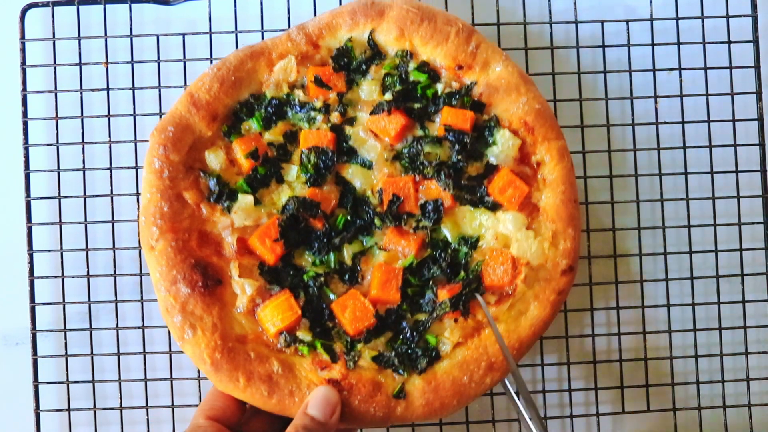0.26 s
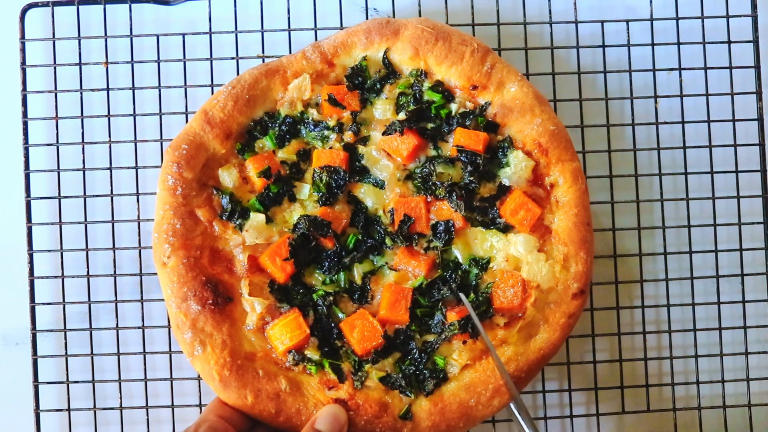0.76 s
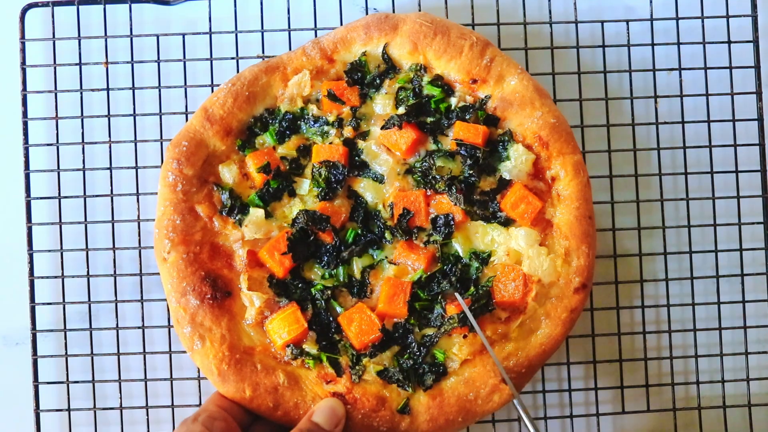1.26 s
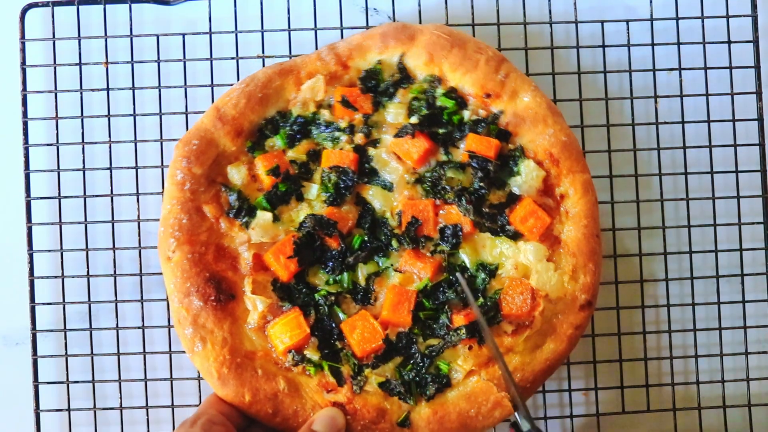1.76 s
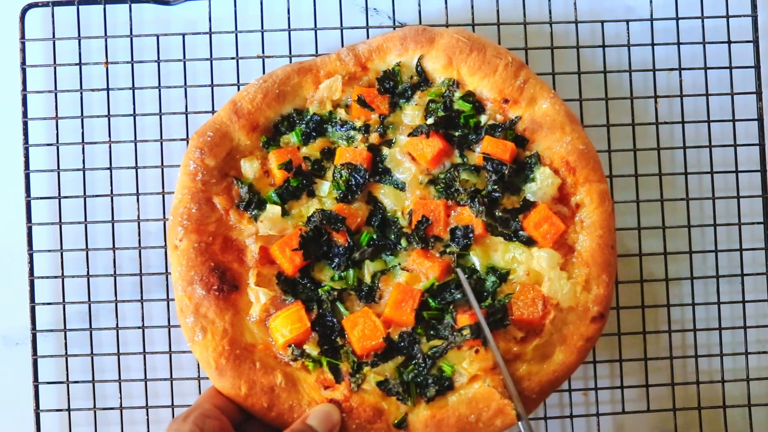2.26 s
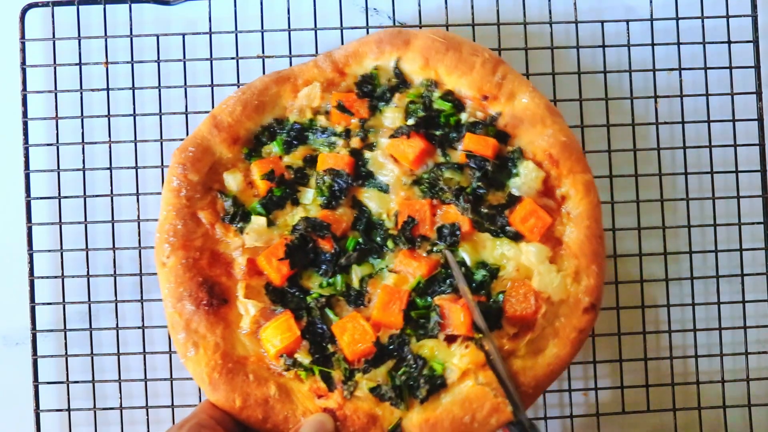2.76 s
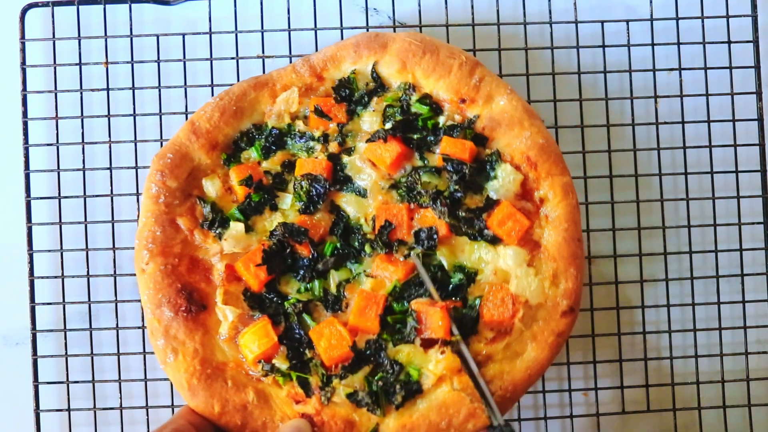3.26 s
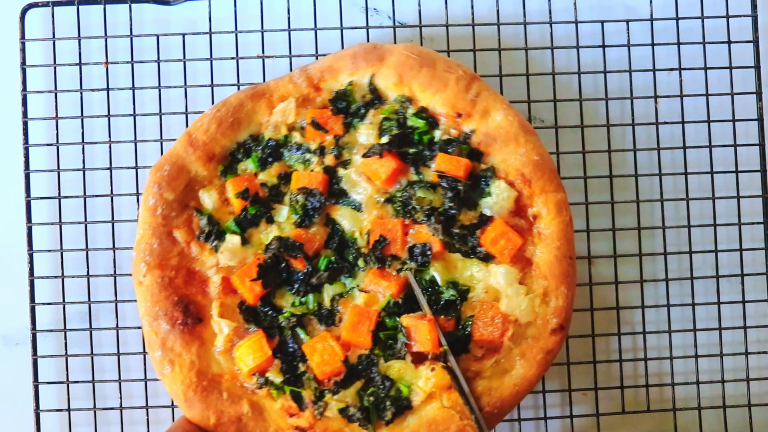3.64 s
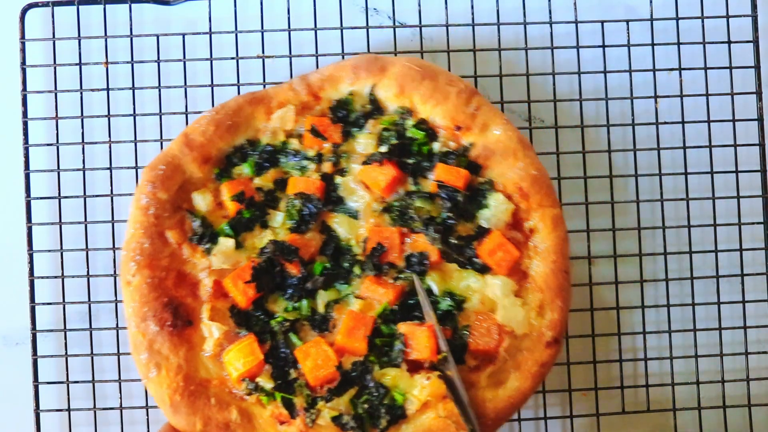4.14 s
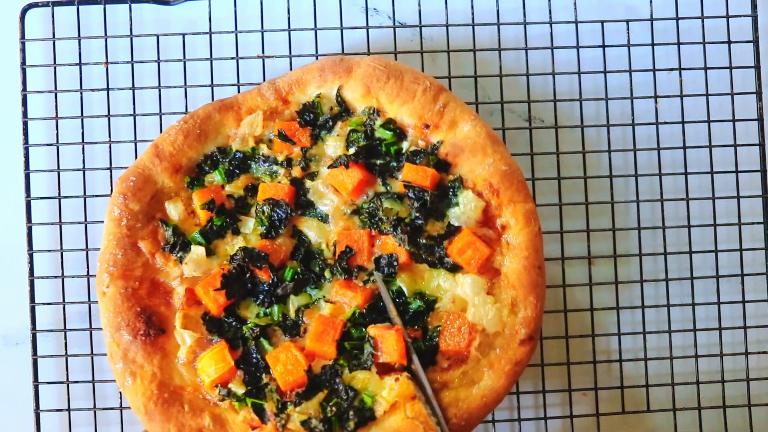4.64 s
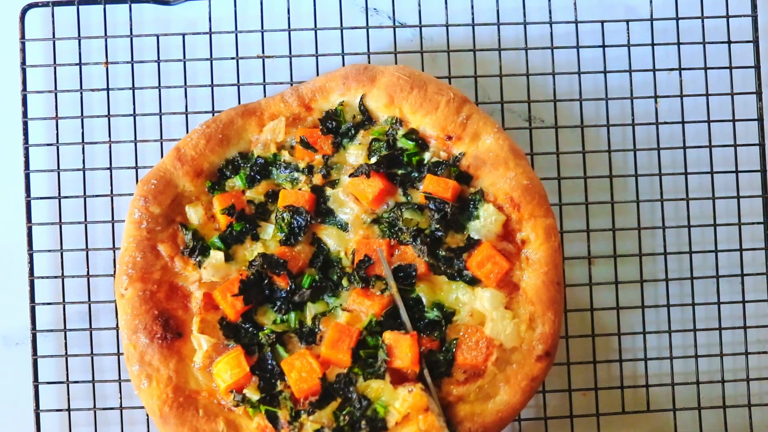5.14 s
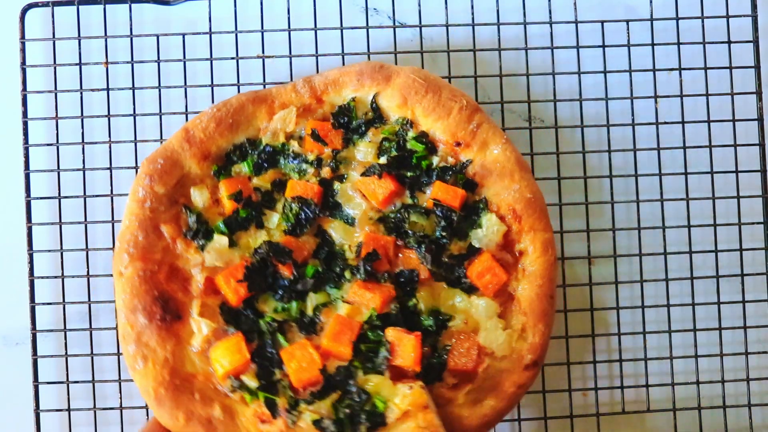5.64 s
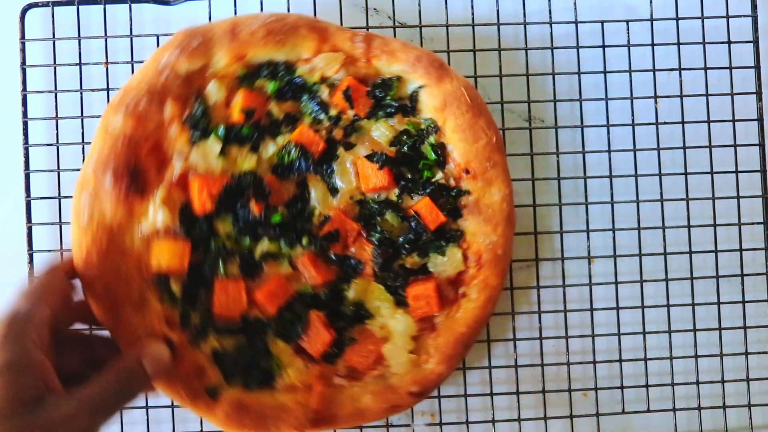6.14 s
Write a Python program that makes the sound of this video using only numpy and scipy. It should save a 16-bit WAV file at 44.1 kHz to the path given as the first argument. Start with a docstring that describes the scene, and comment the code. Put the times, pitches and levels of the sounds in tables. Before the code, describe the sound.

Scissors snip through a crisp pizza crust on a wire rack, with dry snaps, fine crackle, rubbing and dull knocks, close up.

```python
"""In a quiet room, kitchen scissors cut a crisp pizza on a wire cooling rack, heard from close by.
The base drags and knocks on the wires as noise grains and damped tones, and sets the rack ringing.
The crust snaps in noise bursts of a few ms over fine crackle; the table booms through low resonances.
The pivot squeaks twice in gliding tones, the bare blades ring late on, and shaped noise hisses below."""
import sys
import numpy as np
from scipy import signal
from scipy.fft import rfft, irfft, next_fast_len
from scipy.io import wavfile
from scipy.ndimage import uniform_filter1d, map_coordinates

SR = 44100
rng = np.random.default_rng(int(sys.argv[2]) if len(sys.argv) > 2 else 0)


def dump(signal):
    """Clip the signal to [-1, 1] and save it as 16-bit WAV at the path in sys.argv[1]."""
    limited = np.clip(np.atleast_2d(signal).T, -1, 1)
    pcm = np.round(limited * 32767).astype(np.int16)
    wavfile.write(sys.argv[1], SR, pcm)


N = 281799


def amp(db):
    """Logarithmic level: decibels become a gain."""
    return 10 ** (np.asarray(db) / 20)


def unit(x):
    """Normalisation: the signal is scaled to rms 1."""
    return x / np.sqrt(np.mean(x ** 2) + 1e-20)


def along(points, hz):
    """Interpolation of (Hz, value) points on a logarithmic frequency axis."""
    point_hz, value = np.transpose(points)
    return np.interp(np.log(hz + 1), np.log(point_hz + 1), value)


def wobble(rate):
    """Slow random fluctuation: a smooth curve through random knots, rate of them a second."""
    knots = rng.standard_normal(int(N * rate / SR) + 4)
    return map_coordinates(knots, [np.arange(N) * rate / SR])


def filtered(x, response):
    """Linear filtering: the spectrum is multiplied by a complex response of frequency."""
    m = next_fast_len(N + SR // 2)
    return irfft(rfft(x, m) * response(np.fft.rfftfreq(m, 1 / SR)), m)[..., :N]


def coloured(x, spectrum):
    """Spectral shaping: a (Hz, dB) curve weights each frequency."""
    return filtered(x, lambda hz: amp(along(spectrum, hz)))


def resonance(f, centre_hz, width_hz, db):
    """Damped resonator: a causal response that peaks at its centre."""
    damping = 1j * f * width_hz
    return amp(db) * damping / (centre_hz ** 2 - f * f + damping)


def modes(rows):
    """Modal superposition: (Hz, width Hz, dB) resonances are summed with alternating sign."""
    return lambda f: sum((-1) ** k * resonance(f, *row) for k, row in enumerate(rows))


def ringing(rows):
    """Modal superposition in phase: every resonance is in step with the sound that drives it."""
    return lambda f: sum(resonance(f, *row) for row in rows)


def twice(rows):
    """Cascaded resonance: the same response applied twice has steeper skirts."""
    return lambda f: modes(rows)(f) ** 2


def placed(times, rows):
    """Superposition: short sounds, one a row, are added at their times."""
    at = np.round(times * SR).astype(int)[:, None] + np.arange(rows.shape[1])
    return np.bincount(at.ravel(), rows.ravel(), N + rows.shape[1])[:N]


def grains(per_s, spread_db, t60, clump, bed):
    """Friction as shot noise: decaying noise bursts at clumped moments over rubbing, evened slowly."""
    when = rng.random(N) < per_s / SR * np.exp(clump * wobble(40))
    size = when * amp(spread_db * np.minimum(rng.exponential(size=N), 3))
    decay = amp(-60 / (t60 * SR))
    fade = bed + unit(signal.lfilter([1], [1, -decay], size))
    fade /= np.sqrt(np.abs(uniform_filter1d(fade ** 2, size=SR // 12)))
    return unit(fade * rng.standard_normal(N))


def swells(s, swell_s, dying_s, db):
    """Energy summation: overlapping gestures, each rising to a peak and dying, give one level in dB."""
    range_db = 20  # fall from the peak after one swell or dying time
    bend = 1.6  # over 1: rounded at the peak, steeper towards the end
    late = np.arange(0, N + 64, 64) / SR - np.c_[s]
    distance = np.maximum(-late / np.c_[np.abs(swell_s)], late / np.c_[np.abs(dying_s)])
    level_db = np.c_[db] - range_db * distance ** bend
    power = np.sum(amp(level_db) ** 2, axis=0) + amp(-120) ** 2
    total_db = 10 * np.log10(power)
    return np.interp(np.arange(N), 64 * np.arange(len(total_db)), total_db)


# Relative spectrum of the hiss. Each row: frequency in Hz, density in dB.
HISS_SPECTRUM = [(18, -42), (30, -29), (50, -31), (63, 6.5), (107, 3), (146, 4), (171, -4), (306, 0.5),
                 (368, -44), (625, -14), (2470, -4), (16500, -13.5)]


def hiss():
    """Stationary noise: a shaped spectrum at a nearly constant level."""
    level_db = -81.5 + 0.11 * wobble(7.3)
    return amp(level_db) * unit(coloured(rng.standard_normal(N), HISS_SPECTRUM))


# Pushes, squeezes and turns of the pizza. Each row: peak time in seconds, swell in seconds,
# dying in seconds, drag of the base in dB, its bending in dB relative to the drag,
# crackle of the crust in dB, tilt of the crackle to the treble in dB (down for dull, up for bright).
HAND_MOVES = [(.28, 0.029, 0.32, -62, -38, -73.5, -14.5), (.42, 0.13, 0.11, -58.5, -27, -67.5, -11),
              (.52, 0.12, 0.12, -52.5, -15, -62, -12.5), (.65, 0.08, 0.25, -69.5, -31, -71, -7),
              (.76, 0.076, 0.088, -77.5, -35, -69, -12), (.93, 0.13, 0.065, -79.5, -20, -71, -6.5),
              (1.06, 0.12, 0.1, -86.5, -19, -67.5, -4.5), (1.135, 0.023, 0.12, -63, -14, -64.5, -2),
              (1.265, 0.066, 0.4, -58.5, -8.5, -52.5, -4.5), (1.41, 0.058, 0.15, -56, -24, -57, -2),
              (1.702, 0.048, 0.21, -54.5, -16, -54, -10), (1.829, .2, 0.11, -53.5, -14.5, -79, -10),
              (1.56, 0.13, 0.21, -87, -38, -66, -6), (1.972, 0.034, 0.063, -69, -25, -62, -5.5),
              (2.053, 0.085, 0.093, -64.5, -52, -64.5, -8), (2.13, .06, 0.11, -79.5, -33, -70, -6),
              (2.278, 0.015, 0.048, -46.5, -2.5, -60, -7), (2.385, 0.16, 0.092, -61.5, -22, -58.5, -7),
              (2.48, .1, 0.16, -57, -10, -61, 1), (2.59, 0.14, 0.088, -58, -20, -59.5, -7),
              (2.675, .05, .05, -70, -7, -63, -7), (2.703, 0.034, 0.076, -45.5, -3, -60.5, 2),
              (2.76, 0.094, 0.14, -52, -29, -60, -14.5), (2.98, 0.12, .15, -65.5, -39, -69.5, -10.5),
              (3.2, 0.18, 0.36, -78, -52.5, -69.5, -9), (3.318, 0.048, 0.099, -51, -3, -56, -11),
              (3.456, 0.016, 0.028, -58, -10, -50.5, 0), (3.53, 0.45, 0.16, -60, -7, -67.5, -6),
              (3.701, 0.14, 0.11, -56, -16, -58.5, -6.5), (3.85, 0.11, 0.087, -71, -32, -75, -9),
              (3.95, .14, 0.12, -59.5, -24, -71.5, -14), (4.1, 0.12, 0.17, -70.5, -38, -75.5, -14.5),
              (4.19, 0.035, 0.092, -63, -38, -70, -11), (4.24, 0.028, 0.11, -51.5, -21, -67, -13),
              (4.41, 0.18, 0.12, -60.5, -21, -70, -0.5), (4.489, 0.18, 0.22, -62, -35, -71.5, -15),
              (4.64, .025, 0.11, -54, -11, -66, -12), (4.72, 0.15, 0.13, -72, -20, -69, -8),
              (4.834, 0.14, 0.12, -64, -27, -61.5, -6.5), (5, 0.036, 0.51, -61, -14, -66, -6),
              (5.119, 0.14, 0.096, -49, -3, -50.5, -4), (5.355, 0.034, .06, -66, -23, -70, -7),
              (5.435, 0.055, 0.11, -60, -8, -63, -6), (5.55, 0.055, 0.047, -60.5, -30, -56, -6),
              (5.671, 0.11, 0.019, -50, -20.5, -53, -6), (5.71, 0.023, 0.44, -68, -38, -56, -8.5),
              (5.866, .15, 0.088, -54.5, -17.5, -66, -14), (6.005, 0.012, 0.17, -54, -37, -80, 3),
              (6.118, 0.16, 0.13, -47, -16.5, -63, -12), (6.25, 0.16, .14, -54, -12, -54, -4),
              (6.298, 0.066, 0.045, -49.5, -2, -78, -4)]


def hand():
    """Common excitation: the moves set drag, bending, dull crackle and bright crackle, all in dB."""
    s, swell_s, dying_s, drag_db, bend_db, crackle_db, tilt_db = np.transpose(HAND_MOVES)
    levels = (drag_db, drag_db + bend_db, crackle_db - tilt_db, crackle_db + tilt_db)
    return [swells(s, swell_s, dying_s, db) for db in levels]


# Relative spectrum of bread on wires. Each row: frequency in Hz, density in dB.
BREAD_SPECTRUM = [(150, -45), (250, -72.5), (344, -60), (578, 8), (754, 14), (1090, 12.5), (1390, 9.5),
                  (2560, 0.5), (3390, -8.5), (6000, -65), (7800, -63), (13200, -120)]


def drag(drag_db, bend_db):
    """Stick-slip friction: dragging is a stream of small slips, deeper where the loaded base bends."""
    slips = grains(per_s=220, spread_db=2.5, t60=0.019, clump=0.3, bed=1.1)
    slide = unit(coloured(slips, BREAD_SPECTRUM))
    flex = unit(filtered(slips, twice([(467, 360, 0)])))
    return amp(drag_db) * slide + amp(bend_db) * flex


# Knocks of the base on the wires. Each row: start in seconds, relative level in dB,
# mean pitch in Hz before its waver, t60 in seconds (held within 0.008 to 0.2).
BASE_KNOCKS = [(0.276, -36, 954, 0.017), (0.489, -37, 704, 0.024), (0.518, -29.5, 952, 0.032),
               (1.211, -34, 990, 0.007), (1.251, -32.5, 850, 0.015), (1.2752, -24, 856, 0.025),
               (1.3065, -28, 647, 0.019), (1.348, -30, 720, 0.017), (1.3995, -41, 920, 0.099),
               (1.565, -41, 1080, 0.0072), (1.842, -41, 1500, 0.029), (2.2657, -26.5, 824, 0.029),
               (2.378, -35, 810, 0.013), (2.388, -33.5, 774, 0.012), (2.459, -31, 663, 0.015),
               (2.489, -23, 810, 0.012), (2.498, -35, 567, 0.032), (2.5604, -31, 826, 0.027),
               (2.583, -31.5, 694, 0.042), (2.696, -21, 825, 0.014), (2.985, -50.5, 940, 0.03),
               (3.057, -49, 835, 0.076), (3.158, -44.5, 920, 0.016), (3.215, -39, 1210, 0.0071),
               (3.315, -13, 900, 0.0097), (3.322, -26, 760, 0.018), (3.345, -41, 520, 0.045),
               (3.448, -29.5, 1000, 0.0064), (3.542, -33, 985, 0.047), (3.639, -31, 854, 0.0075),
               (3.933, -47, 865, 0.1), (4.237, -40, 840, 0.0099), (4.245, -38.5, 743, 0.029),
               (4.4198, -39.5, 873, 0.045), (4.6331, -29.5, 660, 0.012), (4.648, -33.5, 844, 0.022),
               (4.717, -27, 746, 0.019), (4.764, -19, 835, 0.0056), (4.826, -25.5, 730, 0.012),
               (4.9896, -36.5, 743, 0.027), (5.0391, -26, 690, 0.022), (5.055, -30, 720, 0.028),
               (5.081, -27.5, 532, 0.028), (5.0897, -30, 830, 0.02), (5.1061, -29, 575, 0.047),
               (5.123, -41, 747, 0.094), (5.1547, -38, 858, 0.029), (5.1791, -31, 686, 0.021),
               (5.356, -45.5, 880, 0.028), (5.44, -31.5, 453, 0.018), (5.553, -32, 920, 0.0067),
               (5.5786, -28, 630, 0.0061), (5.612, -26.5, 605, 0.023), (5.652, -41, 820, 0.011),
               (5.677, -23, 1483, 0.023), (5.761, -28.5, 1020, 0.012), (5.806, -25, 1020, 0.0068),
               (5.844, -43.5, 660, 0.034), (5.9973, -26, 720, 0.059), (6.013, -41, 810, 0.013),
               (6.062, -30.5, 1088, 0.072), (6.118, -24, 656, 0.0047), (6.279, -33, 730, 0.051),
               (6.311, -43, 1010, 0.032)]


def knocks():
    """Damped oscillation: each impact is an unsteady decaying tone of the bread with a hard noisy front."""
    s, db, hz, t60 = (c[:, None] for c in np.transpose(BASE_KNOCKS))
    t = np.arange(SR // 8) / SR
    waver = unit(uniform_filter1d(rng.standard_normal((len(s), len(t))), size=40, axis=1))
    pitch_hz = hz * np.exp(0.2 * np.clip(waver, -1, 2))
    phase = 2 * np.pi * np.cumsum(pitch_hz, axis=1) / SR
    fade = amp(db - 60 * t / np.clip(t60, .008, .2))
    onset = 1 - np.exp(-t / 0.0011)
    thump = np.sin(phase) * fade * onset
    front = amp(db - 11.5 - 60 * t / .006)  # t60 6 ms
    edge = rng.standard_normal(thump.shape) * (front + amp(-5.0) * fade)
    body = filtered(placed(s[:, 0], thump), twice([(797, 1480, 0)]))
    return body + filtered(placed(s[:, 0], edge), twice([(1890, 1460, 0.016)]))


# Resonances of the wire rack. Each row: frequency in Hz, width in Hz, gain in dB.
WIRE_MODES = [(575, 35, -2), (700, 35, -5), (765, 30, -4), (835, 35, -4), (980, 40, -6), (1270, 40, -3),
              (1390, 30, -3), (1595, 30, -4)]


def wires(dragging, knocking):
    """Driven resonance: sliding sets the rack singing more than a knock does."""
    return filtered(dragging + amp(-17.0) * knocking, ringing(WIRE_MODES))


# Snaps of the crust. Each row: start in seconds, relative peak in dB,
# brightness in dB (bright part over dull part, held within -30 to 30).
CRUST_SNAPS = [(0.277, -53.5, -19), (0.373, -52, 8), (0.5183, -30.5, -2), (0.7625, -38, -3),
               (0.798, -48, -21), (1.0079, -40.5, -5), (1.0727, -48, 1), (1.145, -54, 3),
               (1.1709, -35, -18), (1.1875, -35, -10), (1.2114, -25.5, -10), (1.2507, -25, -27),
               (1.261, -25, -12), (1.277, -23.5, -22), (1.3086, -32, -18), (1.3128, -32, -6),
               (1.32, -36, -12), (1.332, -33.5, -16), (1.3989, -27, -5), (1.406, -31, 22),
               (1.4152, -32, -9), (1.424, -29, -4), (1.4666, -33.5, -1), (1.6575, -41, -15),
               (1.8215, -35.5, -25), (2.034, -36, -3), (2.041, -37, -27), (2.085, -40, -17),
               (2.1092, -41.5, -6), (2.266, -52, -22), (2.2836, -35.5, -7), (2.351, -44, -6),
               (2.3618, -33, -10), (2.3908, -33.5, -11), (2.4298, -30, -13), (2.46, -28.5, -26),
               (2.4875, -31, -20), (2.5015, -33, -18), (2.5128, -37, -16), (2.5315, -37.5, -16),
               (2.562, -26.5, 11), (2.567, -34.5, -6), (2.5877, -34, 14), (2.602, -36.5, 6),
               (2.6965, -43, 10), (2.759, -33, -8), (2.8531, -45, 4), (2.889, -39.5, 18),
               (3.072, -47.5, -7), (3.18, -47, -15), (3.217, -40, -21), (3.316, -30.5, -19),
               (3.448, -33, 2), (3.467, -38.5, 25), (3.546, -31, 10), (3.5582, -34, 20), (3.6386, -40, -11),
               (3.8316, -42.5, -15), (3.995, -42.5, -2), (4.08, -46.5, -5), (4.1493, -42.5, -1),
               (4.2705, -32.5, -31), (4.2943, -35, 5), (4.3038, -36, 18), (4.38, -37.5, -30),
               (4.3932, -42, -16), (4.4414, -34.5, -30), (4.569, -44.5, -1), (4.5932, -43, 4),
               (4.6332, -34, -22), (4.6894, -32, -5), (4.7165, -43, -16), (4.7641, -30.5, 0),
               (4.8035, -35, -28), (4.8275, -36.5, -14), (4.9597, -40, -8), (4.9677, -39.5, -19),
               (4.9868, -39, 24), (5.098, -36, -5), (5.1708, -36.5, -23), (5.3587, -44.5, -14),
               (5.4276, -38, -19), (5.553, -38, -21), (5.5819, -35.5, -3), (5.6122, -29, 0),
               (5.6514, -38, -19), (5.6757, -24, 2), (5.6786, -18.5, -32), (5.687, -39, -10),
               (5.763, -32, -27), (5.8023, -38, -20), (5.998, -71, -24), (6.121, -46, -5)]


def snaps():
    """Brittle fracture: each crack is a short noise burst, divided into a dull and a bright part."""
    s, db, bright_db = (c[:, None] for c in np.transpose(CRUST_SNAPS))
    t = np.arange(SR // 50) / SR
    run_s = .0003 * (1 + amp(db + 24))  # a big crack runs longer
    u = t / run_s
    envelope = u * np.exp(1 - u) + amp(-21 - 60 * t / 0.072)  # the run, plus a weak tail
    burst = rng.standard_normal(u.shape) * envelope
    burst *= amp(db) / np.abs(burst).max(axis=1, keepdims=True)
    lean = amp(np.clip(bright_db, -30, 30) / 2)
    shared = burst / np.hypot(lean, 1 / lean)  # the two parts keep the power of one
    dull = filtered(placed(s[:, 0], shared / lean), twice([(4550, 9000, 0.0099)]))
    bright = filtered(placed(s[:, 0], shared * lean), twice([(11170, 17400, 0)]))
    return amp(2) * (dull + bright)


# Relative spectrum of the fine crackle. Each row: frequency in Hz, density in dB.
CRACKLE_SPECTRUM = [(880, -10), (1500, -4), (2550, 8), (3380, 1.5), (4390, 4.5), (4850, 0.5), (13100, -4),
                    (15500, -6), (16500, -49)]


def crackle(dull_db, bright_db):
    """Granular noise: many tiny fractures; soft topping dulls them, dry crust brightens them."""
    crumbs = grains(per_s=300, spread_db=6.5, t60=.005, clump=0.65, bed=1.0)
    whole = unit(coloured(crumbs, CRACKLE_SPECTRUM))
    low = filtered(whole, lambda hz: 1 / (1 + (hz / 7000) ** 3))
    return amp(dull_db - 9.0) * low + amp(bright_db + 3.5) * (whole - low)


# Decay of the room. Each row: frequency in Hz, t60 in seconds.
ROOM_DECAY = [(300, 0.44), (1500, 0.043), (5000, 0.12), (14000, 0.017)]


def room(x):
    """Reverberation: convolution with a noise tail whose frequencies die at their own speeds."""
    hz, t, z = signal.stft(rng.standard_normal(SR // 2), SR, nperseg=256)
    decay = amp(-60 * t / along(ROOM_DECAY, hz)[:, None])
    tail = signal.istft(z * decay, SR, nperseg=256)[1]
    delayed = np.pad(x, (200, 0))  # 200 samples, 4.5 ms
    return amp(-15.5) * signal.fftconvolve(delayed, tail / np.linalg.norm(tail))[:N]


# Resonances of the table top. Each row: frequency in Hz, width in Hz, gain in dB.
TABLE_MODES = [(76.3, 17, 16), (138.6, 13, 23.5), (220, 2.8, 25), (292, 315, -16.5)]
# The rack bears down on the table. Each row: blow time in seconds, peak of the driving blow in dB,
# level of the shudder after it in dB, dying of the shudder in seconds.
TABLE_THUMPS = [(.5, -77, -75.5, 0.15), (1.71, -80, -72, 0.13), (2.262, -60, -67, 0.081),
                (2.695, -65, -64.5, 0.15), (3.302, -72, -84, .2), (4.418, -76, -79, 0.091),
                (5.03, -84, -88, 0.18), (5.851, -86, -73, 0.11), (5.997, -64.5, -64.5, 0.13),
                (6.275, -58, -59, 0.11)]


def table_top(bend_db):
    """Forced plate vibration: the table rings with the thumps and the pressure of the hand."""
    def response(hz):
        """Modal response with a low cut near 45 Hz."""
        return modes(TABLE_MODES)(hz) / (1 + (45 / (hz + 1)) ** 4)

    tremor = amp(1.5 * wobble(12))
    pressure = unit(filtered(tremor * rng.standard_normal(N), response))
    s, db, shudder_db, dying_s = np.transpose(TABLE_THUMPS)
    swell_s = .025  # the shudder peaks this long after the blow
    shudder = amp(swells(s + swell_s, swell_s, dying_s, shudder_db))
    push = np.hanning(SR // 250)  # a soft blow of 4 ms
    thumps = filtered(placed(s, amp(db[:, None]) * push), response)
    through = amp(bend_db - 20)  # bending that reaches the table top
    return np.hypot(shudder, through) * pressure + thumps


# Squeaks of the pivot. Each row: start in seconds, end in seconds, first pitch in Hz,
# last pitch in Hz, level of the fundamental in dB, overtones in dB relative to it.
PIVOT_SQUEAKS = [(.91, .965, 1015, 985, -71, -30), (5.955, 5.992, 590, 660, -57, -4)]
# Overtones of a squeak. Each row: multiple of the fundamental, signed weight in dB.
PIVOT_OVERTONES = [(2, 3), (3, -5), (4, -2), (7, -14)]


def squeak():
    """Stick-slip oscillation: the blades stick and slip at the pivot in short, rough gliding tones."""
    t, out = np.arange(N) / SR, np.zeros(N)
    for start, end, from_hz, to_hz, db, over_db in PIVOT_SQUEAKS:
        on = np.clip(np.minimum(t - start, end - t) / 0.0026, 0, 1)
        jitter, shimmer_db = .03 * wobble(300), 3 * wobble(200)
        pitch_hz = np.interp(t, [start, end], [from_hz, to_hz]) * (1 + jitter)
        phase = 2 * np.pi * np.cumsum(pitch_hz) / SR
        overtones = sum(amp(d) * np.sin(k * phase) for k, d in PIVOT_OVERTONES)
        out += on * amp(db + shimmer_db) * (np.sin(phase) + amp(over_db) * overtones)
    return out


# Resonances of the scissors' steel. Each row: frequency in Hz, width in Hz, gain in dB.
BLADE_MODES = [(2900, 600, 0), (6450, 800, 1), (8000, 800, -3)]
# Drive of the blades by the crust as they are pulled out. Each row: time in seconds, gain in dB.
BLADE_DRIVE = [(5.63, -40), (5.65, 2), (5.7, 0), (5.88, -4), (5.93, -40)]


def steel(crisp):
    """Sympathetic resonance: the bare blades ring with the sound of the crust."""
    s, db = np.transpose(BLADE_DRIVE)
    drive = amp(np.interp(np.arange(N) / SR, s, db))
    return filtered(drive * crisp, ringing(BLADE_MODES))


def scene():
    """Superposition of sources: pizza, rack, scissors and table in a quiet room."""
    drag_db, bend_db, dull_db, bright_db = hand()
    dragging, knocking = drag(drag_db, bend_db), knocks()
    crisp = snaps() + crackle(dull_db, bright_db)
    near = dragging + knocking + wires(dragging, knocking) + crisp + squeak() + steel(crisp)
    return (hiss() + near + room(near) + table_top(bend_db))[None]


def record(dry):
    """Band limitation: the recorder keeps nothing from 16300 Hz up."""
    return filtered(dry, lambda hz: hz < 16300)


dry = scene()
out = record(dry)
dump(out)
```